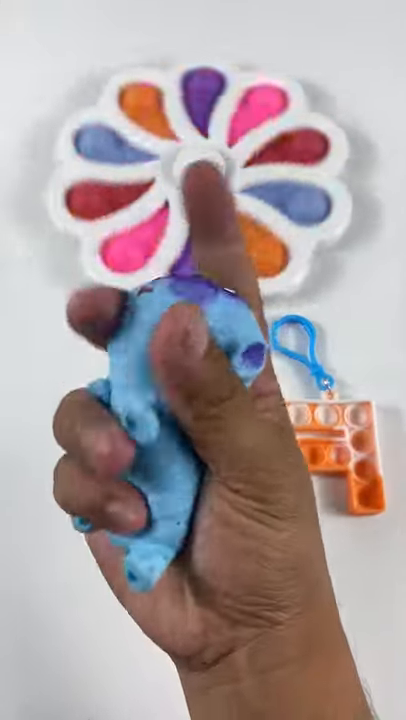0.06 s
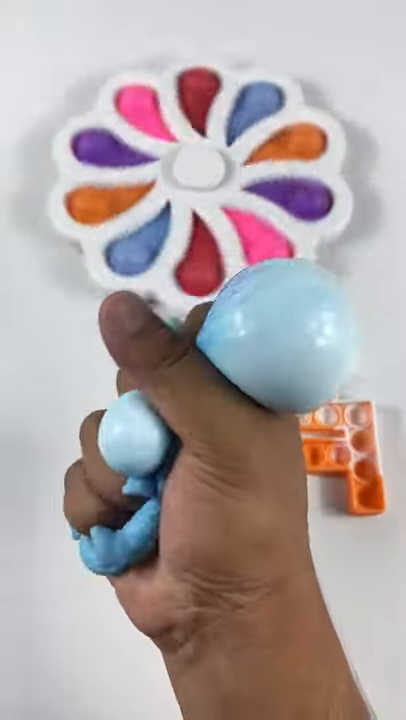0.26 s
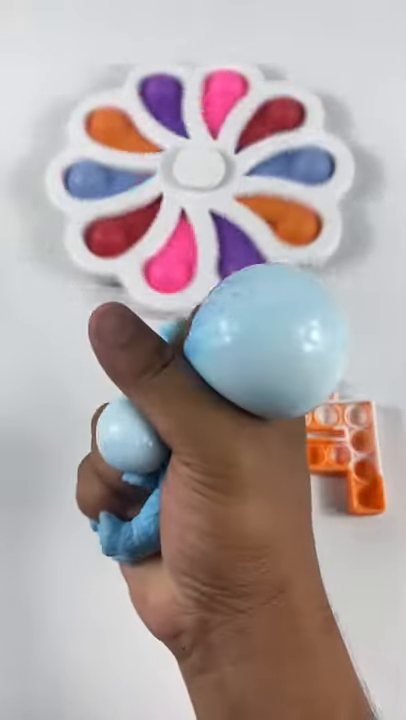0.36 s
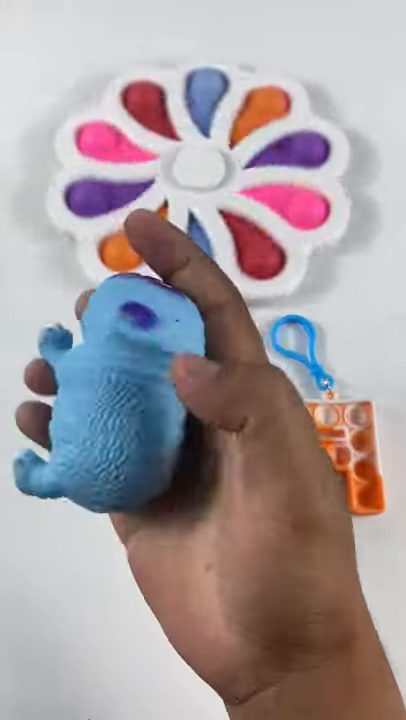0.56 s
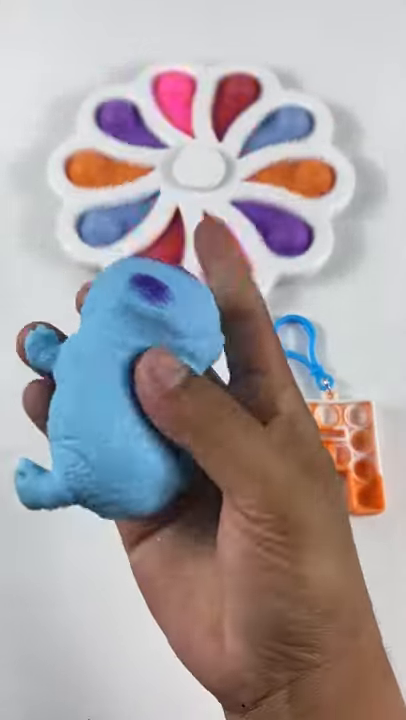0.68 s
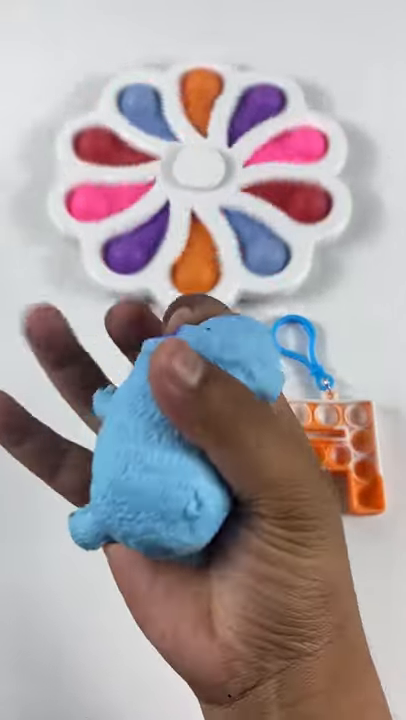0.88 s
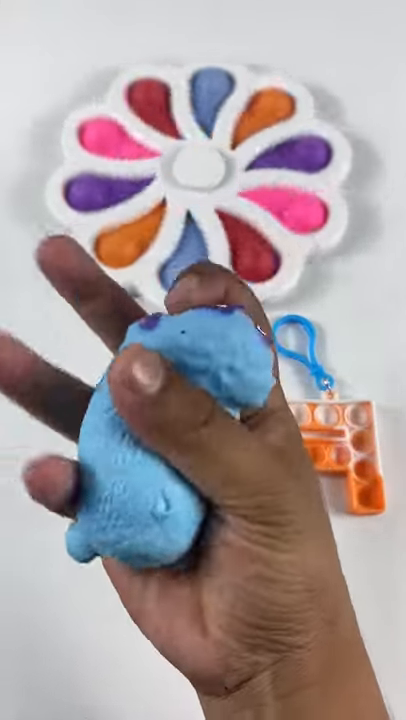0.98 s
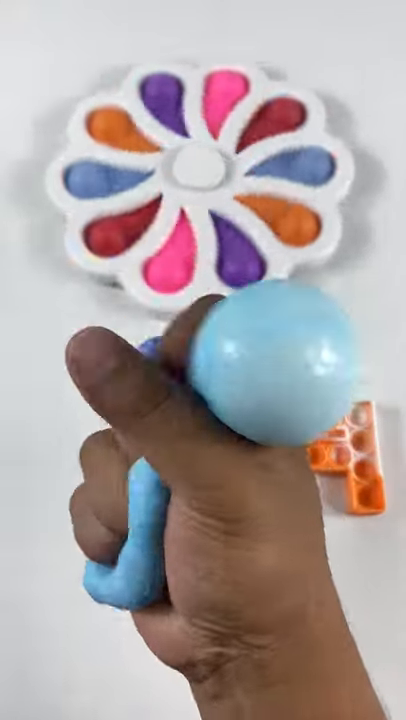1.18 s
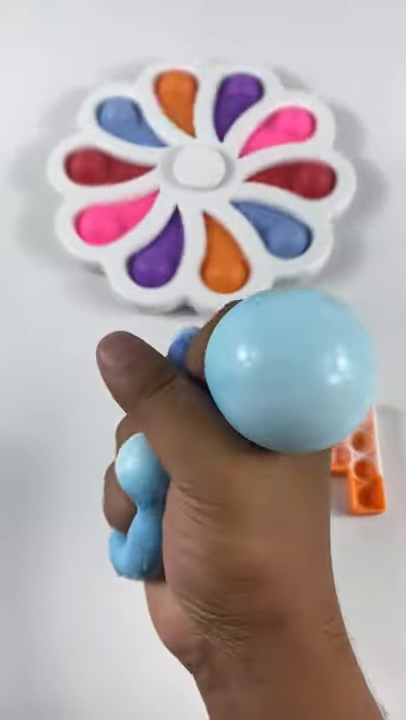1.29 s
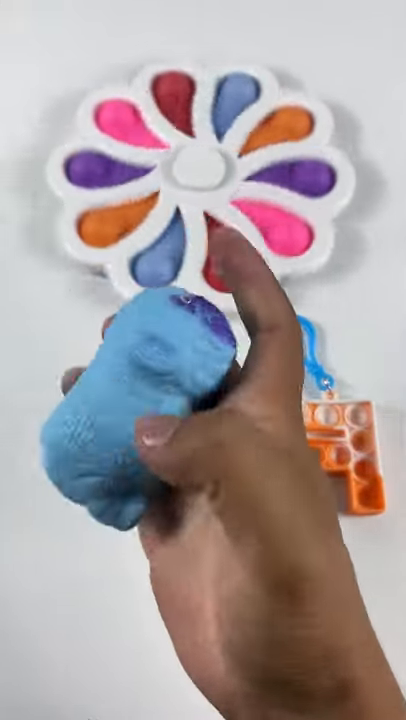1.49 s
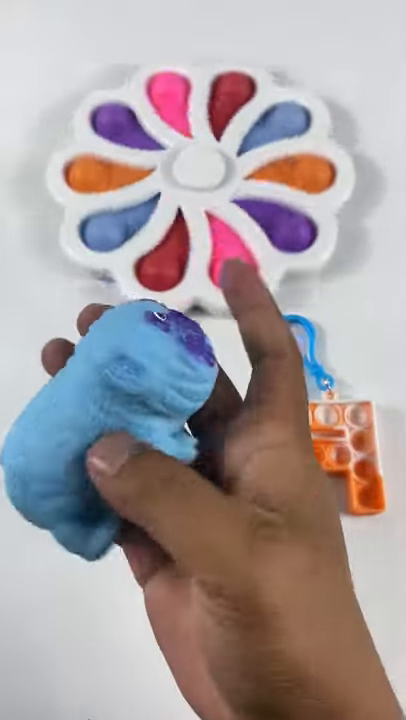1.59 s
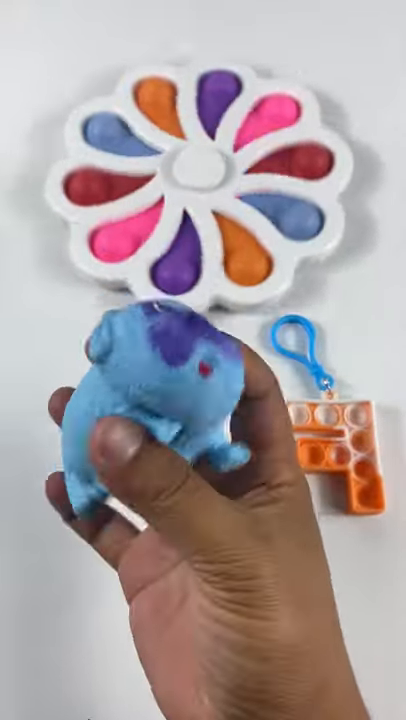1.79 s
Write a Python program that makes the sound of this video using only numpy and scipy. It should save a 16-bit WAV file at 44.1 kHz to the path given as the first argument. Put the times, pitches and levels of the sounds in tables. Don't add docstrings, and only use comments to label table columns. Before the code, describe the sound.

A sticky rubber squeeze toy pops loudly once, then knocks and snaps softly in a hand

```python
import sys
import numpy as np
from scipy import signal
from scipy.fft import rfft, irfft
from scipy.io import wavfile
from scipy.ndimage import uniform_filter1d

SR = 44100
rng = np.random.default_rng(int(sys.argv[2]) if len(sys.argv) > 2 else 0)


def invert_db(level):
    return 10 ** (np.asarray(level, dtype=float) / 20)


def unload_wav(signal):
    wavfile.write(
        sys.argv[1],
        SR,
        np.round(np.clip(np.atleast_2d(signal).T, -1, 1) * 32767).astype(np.int16),
    )


N = 81585

# frequency in Hz, level in dB, decay time t60 in seconds.
POCKET_MODES = [(765.6, 0, 0.046), (677, -6.5, 0.042), (900, -14, 0.054), (1310, -19, 0.021),
                (1675, -8.5, 0.013), (2150, -11, 0.01)]
# dip in seconds, peak in dB, frequency in Hz, length in cycles.
POCKET_CLOSING = [
    (.2598, -8, 1050, 1.02),
    (0.26, -40, 3000, 4.6),
]
# crest in seconds, peak in dB, frequency in Hz, length in cycles.
SKIN_KNOCKS = [(1.2616, -41, 1150, 1.3), (1.2642, -11.5, 1600, 1.23), (1.2641, -16, 2650, 1.9),
               (1.2665, -30, 2900, 4), (1.2682, -29, 1500, 2.9), (1.2685, -32, 2600, 3),
               (1.2707, -23, 1710, 1.2), (1.2727, -14, 1450, 1.85), (1.2727, -14, 2560, 2.8),
               (1.2734, -31.5, 4140, 7.8), (1.2736, -36.5, 5480, 9.1), (1.2751, -25.5, 1390, 2.1),
               (1.277, -28.5, 2210, 2.6)]
# frequency in Hz, level in dB, decay time t60 in seconds.
SNAP_MODES = [(2650, -15, .006), (4050, -6.5, 0.007), (4890, -4, 0.0078), (6030, 2, 0.007),
              (7200, -2.5, 0.0064), (9000, -15, .004), (12000, -9.5, 0.006), (12700, -11, 0.0062),
              (15200, -17, .004)]
# crest in seconds, peak in dB, frequency in Hz, length in cycles.
RUBBER_FLICKS = [
    (.2432, -23.5, 2840, 2.85),
    (1.2617, -35, 1930, 1.4),
]
# start in seconds, rms level in dB, centre in Hz, decay time t60 in seconds.
SKIN_RATTLES = [(0.058, -48, 2450, 0.037), (0.242, -31.5, 5600, 0.019), (.2445, -52, 6460, 0.24),
                (0.475, -53, 1490, 0.12), (.4690, -43, 14800, .02), (0.4974, -34, 6960, 0.011),
                (0.4976, -35, 3900, 0.014), (.5560, -46.5, 4000, 0.037), (.5990, -48, 9500, 0.019),
                (.6350, -55, 11000, 0.013), (1.3140, -55.5, 10000, 0.017), (1.4210, -48, 8500, .03),
                (1.5040, -45, 3300, 0.016), (1.5530, -50.5, 9000, 0.025), (.5070, -44.5, 2900, 0.086),
                (.5210, -43, 2900, 0.063), (.5530, -49, 1280, 0.092), (1.0160, -55.5, 2980, 0.027),
                (1.211, -41, 1600, 0.036), (1.2451, -33.5, 11500, 0.0054), (1.2634, -34, 5000, 0.0057),
                (1.2653, -33, 2500, 0.014), (1.2703, -28, 2460, 0.019), (1.276, -32, 2040, 0.032),
                (1.2800, -51, 10000, .02), (1.4626, -31.5, 1540, .03), (1.4630, -30.5, 6000, 0.016),
                (1.464, -36, 12600, 0.006), (1.464, -44, 5100, 0.075), (1.469, -41.5, 900, 0.093),
                (1.4780, -42, 1730, 0.048), (1.488, -42, 950, 0.07), (1.4970, -43.5, 2200, 0.056)]
# crest in seconds, peak in dB, frequency in Hz, length in cycles.
WET_BLIPS = [(.168, -42.5, 1080, 1.7), (.168, -45.5, 3000, 3.3), (1.412, -50, 4050, 9.1),
             (.293, -34, 2010, 1.1), (0.414, -39, 1600, 1.5), (.499, -34, 688.2, 3.3),
             (.512, -42, 2670, 17), (0.528, -34, 2730, 4.7), (.062, -39, 1210, 2.1), (.557, -37, 464, 1.7),
             (.565, -37, 431, 3.8), (0.823, -41, 477, 2.6), (.845, -49, 756, 6.5),
             (1.018, -49.5, 3160, 7.3), (1.2051, -34.5, 453, 1.16), (1.210, -32, 587, 2),
             (1.215, -33, 740, 1.8), (1.2271, -35.5, 1050, 2.7), (1.240, -45, 4300, 9.2),
             (1.485, -36.5, 477, 3.2), (1.495, -38.5, 785, 1.6), (1.504, -36.5, 470, 2.2),
             (1.531, -47.5, 3950, 12), (1.551, -44, 450, 3.8), (1.601, -46, 437, 2.5)]
# start in seconds, rms level in dB, centre in Hz, decay time t60 in seconds.
STICKY_TICKS = [(.0194, -51, 10500, .03), (.0618, -53, 8500, .04), (.1665, -53, 5000, .02),
                (.1885, -52, 9000, .04), (.5324, -44, 9400, .02), (.6644, -55, 8000, .04),
                (.6888, -53, 9000, .03), (.7138, -52, 7500, .03), (.7310, -54, 13500, .02),
                (.7526, -52, 8400, .04), (.7660, -54, 5500, .03), (.7845, -47, 7000, .015),
                (.8170, -53, 6500, .02), (.8639, -54, 7900, .04), (.9014, -54, 8500, .05),
                (.9313, -53, 8300, .04), (.9717, -53, 9500, .06), (1.0161, -50, 8000, .05),
                (1.035, -50, 9500, .06), (1.056, -55, 8000, .03), (1.0934, -52, 9100, .06),
                (1.1333, -53, 8300, .06), (1.6297, -50, 9500, .02), (1.690, -55, 9000, .03),
                (1.734, -54, 8600, .03), (1.7729, -53, 9200, .03), (1.7988, -55, 8200, .03)]
# start in seconds, length in seconds, level in dB.
RUB_STROKES = [(.001, 0.048, -62.5), (0.056, 0.029, -59.5), (0.087, 0.087, -66), (0.166, 0.049, -62),
               (0.199, .04, -64), (0.246, .12, -59.5), (0.377, 0.086, -56), (0.465, 0.081, -50.5),
               (0.541, 0.066, -54), (0.616, 0.11, -63), (0.705, 0.096, -62), (0.796, 0.17, -66.5),
               (1.007, 0.12, -65), (1.203, 0.018, -47), (1.238, 0.032, -61), (1.27, 0.083, -66.5),
               (1.351, 0.036, -60), (1.392, 0.073, -56), (1.456, 0.048, -56.5), (1.509, 0.053, -58),
               (1.59, 0.21, -66.5)]
# frequency in Hz, level in dB per Hz.
RUB_SPECTRUM = [(120, -13), (200, -9), (334, -6.5), (424, -9), (1140, -11.5), (2700, -19.5), (3250, -20.5),
                (7540, -21), (16000, -28.5)]
# centre in Hz, level in dB, decay time t60 in seconds.
ROOM_BANDS = [(330, -31.5, 0.21), (523, -23, 0.4), (794, -27.5, 0.62), (1050, -29, 0.25),
              (1600, -34.5, 0.32), (2870, -28.5, 0.47), (5870, -25, 0.28)]
# frequency in Hz, level in dB per Hz.
HISS_SPECTRUM = [(41, -28), (70, 5), (152, -14.5), (664, -18), (2600, -31), (2980, -35), (4480, -34.5),
                 (8470, -44), (16000, -43)]
# centre in Hz, width in Hz, level in dB.
AIR_DRONES = [(46.9, 13.2, -43.5), (27.8, 16.5, -48.5), (177, 24, -64), (368.3, 31, -66.5),
              (636, 99, -64.5), (1200, 480, -64.5), (2900, 320, -70), (8500, 1600, -73.5)]
# time in seconds, level in dB.
RUMBLE_LEVEL = [(0.0, -45), (0.426, -43.5), (0.534, -46), (0.658, -44.5), (0.984, -49.5), (1.118, -49.5),
                (1.422, -47), (1.606, -50.5), (1.772, -47), (1.85, -47)]


def band(x, hz, width_hz):
    return signal.lfilter(*signal.iirpeak(min(hz, .45 * SR), hz / width_hz, fs=SR), x)


def unit(x):
    return x / np.sqrt(np.mean(x ** 2))


def colour(x, spectrum):
    hz, db = np.array(spectrum).T
    f = np.maximum(np.arange(N // 2 + 1) * SR / N, 1)
    gain = invert_db(np.interp(np.log(f), np.log(hz), db, left=-90))
    return irfft(rfft(x) * gain, N)


def walk(rate):
    k = int(SR / rate)
    return unit(uniform_filter1d(uniform_filter1d(rng.standard_normal(N), k), k))


def rings(t, start_s, modes, rise_s):
    u = np.maximum(t - start_s, 0)
    out = sum(invert_db(db - 60 * u / t60) * -np.cos(2 * np.pi * hz * u) for hz, db, t60 in modes)
    return out * (1 - np.exp(-u / rise_s))


def wavelets(t, rows, tail, sag=0):
    out = np.zeros(N)
    for s, db, hz, cycles in rows:
        u = (t - s) * hz
        tone = np.cos(2 * np.pi * u * (1 - sag * np.tanh(u)))
        swell = np.exp(-(u / np.where(u < 0, .5, tail) / cycles) ** 2)
        out += invert_db(db) * tone * swell
    return out


def bursts(t, rows, width):
    out, noise = np.zeros(N), rng.standard_normal(N)
    for s, db, hz, t60 in rows:
        u = np.maximum(t - s, 0)
        grit = unit(band(band(noise, hz, width * hz), hz, width * hz))
        out += grit * invert_db(db - 60 * u / t60) * np.minimum(u * 3000, 1)
    return out


def pop(t, ring_share):
    start_s, suck_db, suck_s, suck_back_s = .2420, -5, 0.00073, 0.00011
    u = t - start_s
    suck = -invert_db(suck_db) * np.exp(-np.abs(u) / np.where(u < 0, suck_s, suck_back_s))
    modes = [(hz, db, t60 * ring_share) for hz, db, t60 in POCKET_MODES]
    return suck + rings(t, start_s, modes, rise_s=0.0017) - wavelets(t, POCKET_CLOSING, 0.85)


def knocks(t):
    return wavelets(t, SKIN_KNOCKS, 0.92)


def snaps(t):
    first = invert_db(-14.5) * rings(t, 1.4629, SNAP_MODES, .0001)
    again = invert_db(-25.5) * rings(t, 1.4638, SNAP_MODES, .0001)
    return first + again


def flicks(t):
    return wavelets(t, RUBBER_FLICKS, 1.0, sag=0.12)


def rattles(t):
    return bursts(t, SKIN_RATTLES, 0.73)


def blips(t):
    return wavelets(t, WET_BLIPS, 0.85)


def ticks(t):
    return invert_db(-4) * bursts(t, STICKY_TICKS, 0.95)


def rub(t):
    grains_per_s, grain_spread_db = 9000, 1.5
    rise_s, fall_s = 0.0093, 0.013
    slips = (rng.random(N) < grains_per_s / SR) * rng.standard_normal(N)
    x = colour(slips * invert_db(grain_spread_db * rng.exponential(size=N)), RUB_SPECTRUM)
    x = x / np.std(band(x, 7860, 11200))
    press = np.zeros(N)
    for s, length, db in RUB_STROKES:
        fall = np.exp(-np.maximum(t - s - length, 0) / fall_s)
        press += invert_db(db) * np.clip((t - s) / rise_s, 0, 1) * fall
    flutter_db = 1.8 * walk(90)
    return x * press * invert_db(-1 + flutter_db)


def room(x, t):
    gap_s = .014
    u = t[:SR]
    tail = np.zeros(SR)
    for hz, db, t60 in ROOM_BANDS:
        noise = unit(band(band(rng.standard_normal(SR), hz, 0.57 * hz), hz, 0.87 * hz))
        tail += noise * invert_db(db - 60 * u / t60) / np.sqrt(t60 * SR / 14)
    return signal.fftconvolve(x, tail * (1 - np.exp(-(u / gap_s) ** 2)))[:N]


def room_tone(t):
    hiss_db = -54.5 + .8 * walk(30)
    tone = unit(colour(rng.standard_normal(N), HISS_SPECTRUM)) * invert_db(hiss_db)
    for hz, width_hz, db in AIR_DRONES:
        hum = band(band(rng.standard_normal(N), hz, width_hz), hz, 1.57 * width_hz)
        tone += invert_db(db) * unit(hum)
    rumble_top_hz, rumble_ref_db = 93, -44.5
    low = signal.sosfiltfilt(signal.butter(2, rumble_top_hz, fs=SR, output="sos"), tone)
    rumble_db = np.interp(t, *np.array(RUMBLE_LEVEL).T)
    return tone + low * (invert_db(rumble_db - rumble_ref_db) - 1)


def scene():
    t = np.arange(N) / SR
    small = knocks(t) + snaps(t) + flicks(t) + rattles(t) + blips(t) + ticks(t)
    direct = pop(t, ring_share=0.83) + small
    tail = room(invert_db(4.5) * pop(t, ring_share=.28) + small, t)
    return (direct + tail + rub(t) + room_tone(t))[None]


def top_cut(x):
    return signal.sosfilt(signal.butter(12, 16630, fs=SR, output="sos"), x)


def record(dry):
    top_hz = 15800
    dry = signal.sosfilt(signal.ellip(6, .3, 28, top_hz, fs=SR, output="sos"), dry)
    crest = .7 * np.tanh((dry / .7) * (1 + .4 * (dry / .6) ** 2))
    return top_cut(crest)


dry = scene()
out = record(dry)
unload_wav(out)
```